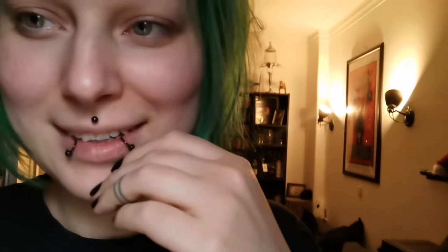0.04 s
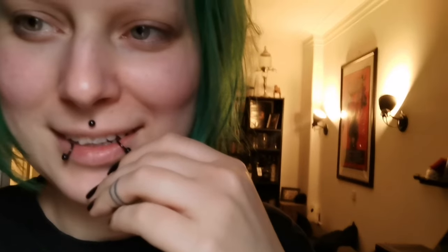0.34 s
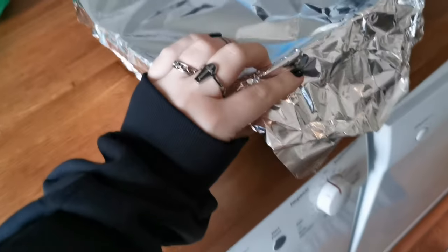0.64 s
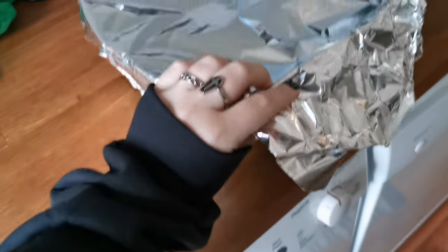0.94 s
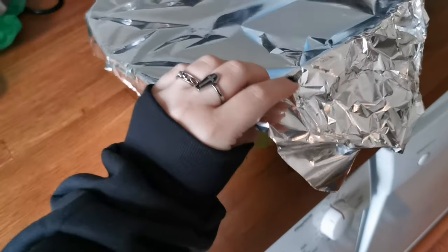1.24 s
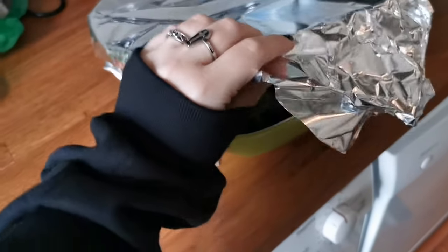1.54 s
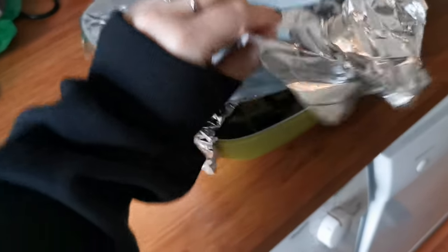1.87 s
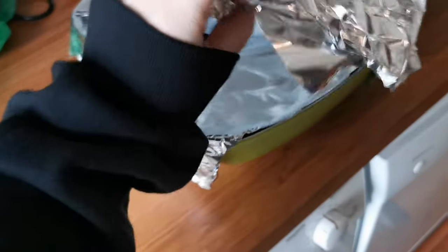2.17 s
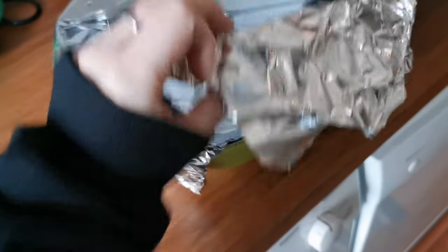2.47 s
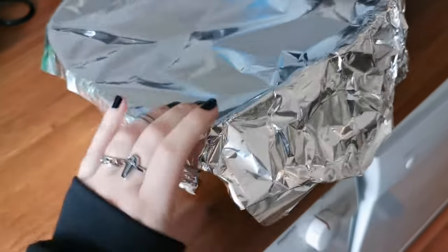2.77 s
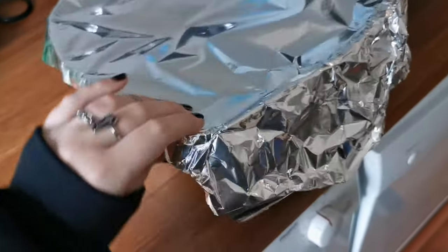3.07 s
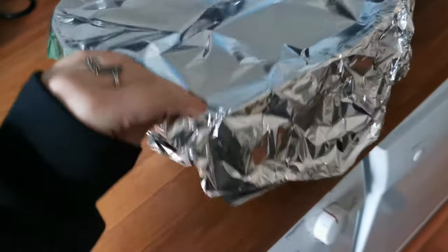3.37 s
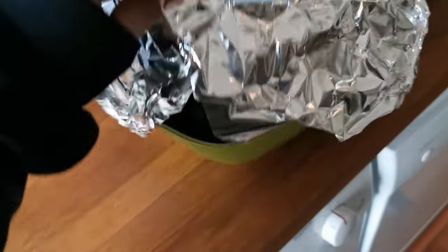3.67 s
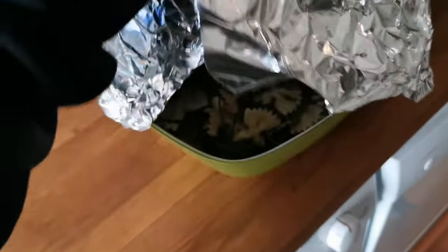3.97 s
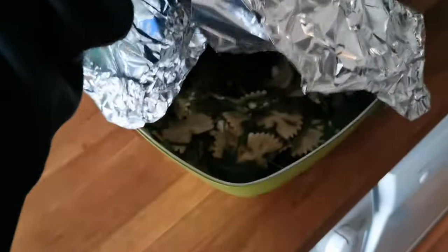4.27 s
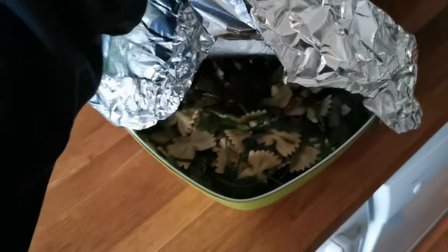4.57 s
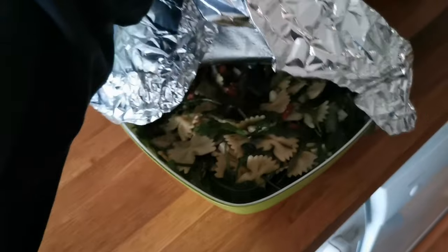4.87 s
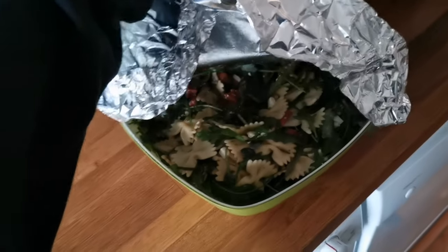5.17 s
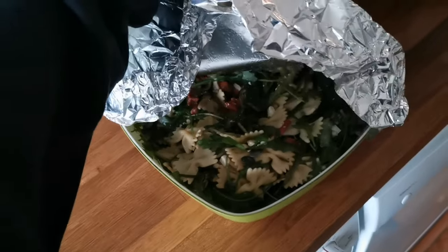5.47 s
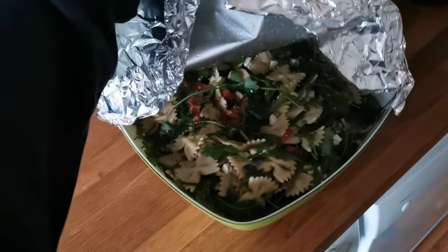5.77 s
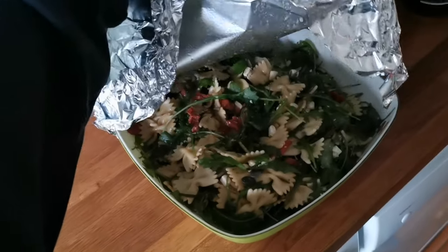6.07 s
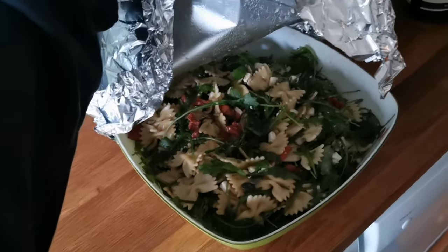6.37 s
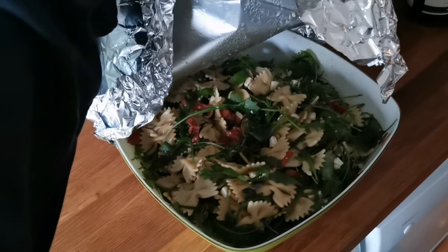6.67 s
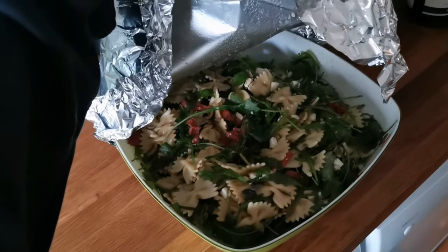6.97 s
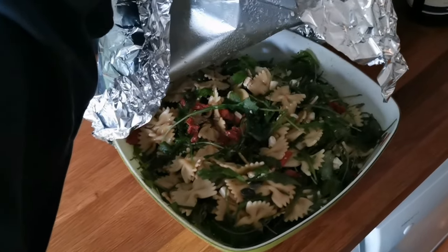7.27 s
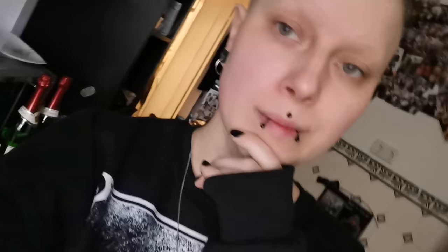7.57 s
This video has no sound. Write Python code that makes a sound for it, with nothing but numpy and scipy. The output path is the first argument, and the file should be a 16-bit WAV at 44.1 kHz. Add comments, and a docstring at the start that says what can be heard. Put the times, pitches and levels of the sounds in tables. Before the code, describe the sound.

Aluminium foil crinkles, crackles and snaps as it is peeled back from a dish in a small kitchen, with faint handling rumble.

```python
"""Aluminium foil peeled back from a dish of pasta on a kitchen counter, heard from a hand-held phone.
Its facets buckle in little avalanches of clicks, big creases snap, the loose sheet flaps and bumps
the dish. The kitchen rings briefly; the hand on the phone rumbles, mostly in the right microphone.
A moment of another room's quiet air and a short silence come first."""
import sys
import numpy as np
from scipy import signal
from scipy.fft import rfft, irfft
from scipy.io import wavfile
from scipy.ndimage import uniform_filter1d

SR = 44100
rng = np.random.default_rng(int(sys.argv[2]) if len(sys.argv) > 2 else 0)


def materialize(psi):
    """Save the field psi as 16-bit PCM at rate SR to the path in sys.argv[1].

    A 1-D psi becomes a single channel; in a 2-D psi each row is a channel.
    """
    bounded = np.clip(np.atleast_2d(psi).T, -1, 1)
    quanta = np.round(bounded * 32767).astype(np.int16)
    wavfile.write(sys.argv[1], SR, quanta)


N = 340888
TIME, FREQS = np.arange(N) / SR, np.fft.rfftfreq(N, 1 / SR)
FIRST_ROOM_END_S, KITCHEN_START_S, KITCHEN_END_S = 0.413, 0.665, 7.587
USUAL_EFFORT_DB = -50  # an ordinary pull on the foil


def amp(db):
    return 10 ** (np.asarray(db) / 20)


def unit_rms(x):
    return x / np.sqrt(np.mean(x ** 2) + 1e-20)


def at_hz(table, hz, column=1):
    """One column of a spectrum table, interpolated on a log-frequency axis."""
    table = np.array(table, float)
    return np.interp(np.log(hz + 1), np.log(table[:, 0] + 1), table[:, column])


def over_time(table):
    return np.interp(TIME, *np.transpose(table))


def add(mix, start_s, sound):
    part = mix[:, max(round(start_s * SR), 0):][:, :sound.shape[1]]
    part += sound[:, :part.shape[1]]


def colour(x, gain_db, size=2048):
    """Causal filter with the response gain_db(hz)."""
    log_gain = np.log(amp(gain_db(abs(np.fft.fftfreq(size, 1 / SR)))))
    taps = np.fft.ifft(np.exp(np.conj(signal.hilbert(log_gain)))).real
    return signal.oaconvolve(x, taps[None, :size // 2], axes=1)[:, :N]


def unit_band(x, lo_hz, hi_hz):
    return unit_rms(signal.sosfilt(signal.butter(3, [lo_hz, hi_hz], "band", fs=SR, output="sos"), x))


def noise(spectrum):
    """Two unrelated channels of steady noise with a given spectrum."""
    return unit_rms(irfft(rfft(rng.standard_normal((2, N))) * amp(at_hz(spectrum, FREQS)), N))


def thud(hz, decay_cycles):
    """A soft blow sets off a damped swing."""
    turns = np.arange(SR // 5) / SR * hz
    swing = np.sin(2 * np.pi * turns) * np.exp(-turns / decay_cycles) * (1 - np.exp(-turns / 0.11))
    return swing / abs(swing).max()


# Room tone of the first room. Each row: frequency in Hz, relative density in dB.
FIRST_ROOM_AIR = [(40, -26), (110, -33), (300, -6.5), (450, -5), (800, -11.5), (1200, -12), (2000, -11),
                  (4000, -20), (8000, -27.5), (11000, -20.5), (15500, -32)]
# Room tone of the kitchen. Each row: frequency in Hz, relative density in dB, left over right in dB.
KITCHEN_AIR = [(39.4, 8.5, -6.5), (110, -3.5, -4), (191, -10.5, 1.5), (410, -2, -6.5), (750, -14.5, -13),
               (1020, -11.5, -15.5), (1330, -15.5, -21.5), (1780, -17, -4), (2100, -18.5, -18.5),
               (3120, -24, -9.5), (7600, -35.5, 9), (11300, -31.5, -9.5), (15500, -39, 7)]


def room_tone(first_room_db=-73, kitchen_db=-62):
    """Steady air noise around the microphones, softer in the first room."""
    air = noise(KITCHEN_AIR)
    left = colour(air[:1], lambda hz: at_hz(KITCHEN_AIR, hz, column=2) / 2)
    right = colour(air[1:], lambda hz: -at_hz(KITCHEN_AIR, hz, column=2) / 2)
    first_room = amp(first_room_db) * noise(FIRST_ROOM_AIR)
    return np.where(TIME < KITCHEN_START_S, first_room, amp(kitchen_db) * np.vstack([left, right]))


# Rumble in the phone's case. Each row: frequency in Hz, relative density in dB.
CASE_RUMBLE = [(10, -8.5), (22, -3), (36, -8.5), (55, -9), (80, -19), (130, -25.5), (300, -37),
               (900, -99.5)]
# The hand on the phone, shakier once it leans over the dish.
# Each row: time in seconds, relative level in dB.
HAND_SHAKE = [(0.03, -65), (0.09, -51.5), (0.41, -60), (0.67, -56.5), (0.96, -61), (1.2, -74), (3.6, -78),
              (3.85, -55), (4.55, -57), (4.77, -50.5), (5.55, -53), (5.7, -48), (6.7, -52.5), (7.58, -46.5)]
# Fingers shift on the case. Each row: start in seconds, peak on the right in dB, pitch in Hz.
FINGER_TAPS = [(6.21, -35.5, 254), (6.813, -36.5, 337), (6.981, -36.5, 224), (7.173, -40, 319),
               (7.504, -33.5, 160), (7.515, -27, 37.7), (7.538, -36, 110)]


def handling_noise():
    """The case carries rumble and taps; in the kitchen the grip lies by the right microphone."""
    left_db = np.where(TIME < KITCHEN_START_S, -4, -19)
    out = noise(CASE_RUMBLE) * amp(over_time(HAND_SHAKE) + 4.5) * amp([left_db, np.zeros(N)])
    for start_s, db, hz in FINGER_TAPS:
        add(out, start_s, amp([[db - 35], [db]]) * thud(hz, decay_cycles=0.34))
    return out


# The kitchen's ring, heard at the counter. Each row: frequency in Hz, seconds to fall by 60 dB.
KITCHEN_T60 = [(200, 0.36), (1000, 0.21), (3500, 0.36), (9000, 0.23), (15000, 0.19)]


def kitchen_reverb(x, wet_db, build_s=0.0023, tails=4):
    """Direct sound plus diffuse tails; the echo pattern shifts as the sound moves over the sheet."""
    out = x.copy()
    for k in range(tails):
        hz, t, spectra = signal.stft(rng.standard_normal((2, SR // 2)), SR, nperseg=256)
        spectra *= amp(-60 * t / at_hz(KITCHEN_T60, hz)[:, None]) * (1 - np.exp(-t / build_s))
        tail = signal.istft(spectra, SR, nperseg=256)[1]
        tail /= np.linalg.norm(tail[0])
        share = np.sqrt(2 / tails) * np.cos(np.pi * (TIME * 7 + k / tails))
        out += amp(wet_db) * signal.fftconvolve(x * share, tail, axes=1)[:, :N]
    return out


# The phone's microphone pair. Each row: frequency in Hz, left over right in dB, likeness from 0 to 1.
MIC_PAIR = [(200, 4.5, 1), (500, -4.5, 0.99), (1020, 3, 0), (1530, 0, 0.6), (2190, -3.5, 0.06),
            (3950, 2.5, 0), (5600, 3, 0.1), (6400, 10, 0.2), (7600, 24, 0), (9000, 31.5, 0.99),
            (9870, -2, 0), (10380, -0.5, 0.98), (12200, 1.5, 0.6), (14000, 9, 0.3)]
# Arrival at the right microphone. Each row: frequency in Hz, lag behind the left in milliseconds.
RIGHT_LAG = [(100, 0), (4000, 0.31), (5200, 0.0)]


def microphones(x):
    """The two microphones hear alike in some bands; in others the right one is shadowed."""
    left, right = rfft(x)
    alike = np.clip(at_hz(MIC_PAIR, FREQS, column=2), 0, 1)
    lean = amp(at_hz(MIC_PAIR, FREQS))
    mid = np.sqrt(1 + alike) * (left + right) / 2
    side = np.sqrt(1 - alike) * (left - right) / 2
    lag = np.exp(-2j * np.pi * FREQS * at_hz(RIGHT_LAG, FREQS) / 1000)
    return irfft(np.array([lean * (mid + side), lag * (mid - side)]) * np.sqrt(2 / (1 + lean ** 2)), N)


# Soft blows at the dish. Each row: start in seconds, relative level in dB, pitch in Hz, decay in cycles.
SHEET_BUMPS = [(0.668, -47.5, 770, 1.1), (1.208, -51.5, 580, 1.2), (1.935, -55.5, 635, 22),
               (1.95, -57, 518, 15), (2.273, -56, 180, 0.9), (2.692, -35.5, 860, 0.49),
               (2.705, -49, 440, 0.94), (4.605, -49, 242, 1.3), (5.044, -49, 217, 0.88),
               (5.644, -58, 532, 9.6), (6.022, -61, 500, 1.9), (6.254, -49, 312, 2.2)]


def sheet_bumps():
    """The loose sheet flaps or bumps against the dish."""
    out = np.zeros((2, N))
    for start_s, db, hz, decay_cycles in SHEET_BUMPS:
        add(out, start_s, amp([[db], [db]]) * thud(hz, decay_cycles))
    return out


# The foil's broad spectrum. Each row: frequency in Hz, gain in dB.
FOIL_SPECTRUM = [(100, -27.5), (220, -14), (370, -5.5), (530, -7.5), (760, -4), (1650, -9), (2050, -7),
                 (3300, -4), (5000, -5), (7800, -1.5), (9700, -4.5), (10900, -2.5), (13800, -6.5),
                 (15700, -7.5)]
# Resonances of the air under the foil, then of the bent sheet.
# Each row: centre in Hz, width in Hz, gain in dB.
FOIL_RESONANCES = [(240, 18, 3), (303, 16, 5), (385, 58, 9), (528, 30, 15.5), (635, 28, 9.5),
                   (830, 26, 10.5), (1076, 260, 5), (2260, 370, 3), (3380, 600, -2), (4800, 1500, 3.5)]


def foil_gain_db(hz):
    """The sheet and the hollow beneath it colour every click."""
    peaks_db = sum(db / (1 + (2 * (hz - centre) / width) ** 2) for centre, width, db in FOIL_RESONANCES)
    return at_hz(FOIL_SPECTRUM, hz) + peaks_db


def facet_pop(ring_s, uneven_db, ping_hz, ping_db, ping_s, size=1400):
    """One facet pops: a crack that dies in a few ms, and a thin metallic ping."""
    t, hz = np.arange(size) / SR, np.fft.rfftfreq(size, 1 / SR)
    modes_db = uneven_db * np.interp(hz, np.linspace(0, SR / 2, num=18), rng.standard_normal(18))
    phases = np.exp(2j * np.pi * rng.random((2, len(hz))))
    crack = irfft(phases * amp(modes_db)) * np.exp(-t / ring_s)
    ping = np.sin(2 * np.pi * (ping_hz * t + rng.random((2, 1)))) * np.exp(-t / ping_s)
    return unit_rms(unit_rms(crack) + amp(ping_db) * unit_rms(ping)) / np.sqrt(size)


# Big creases giving way over the dish.
# Each row: start in seconds, relative level in dB, relative treble in dB, ping in Hz.
CREASE_SNAPS = [(0.668, -38, -6.5, 2370), (0.6739, -37, -4, 9100), (0.8034, -36.5, -13, 7400),
                (0.9277, -39.5, 5, 5430), (0.968, -41.5, -4, 2840), (1.0335, -45, 1.5, 9100),
                (1.103, -35, -33, 8250), (1.206, -35.5, 0.5, 6900), (1.4137, -32.5, -26, 5700),
                (1.801, -39.5, -5.5, 4900), (1.933, -28, -2.5, 9000), (2.094, -41, 7.5, 8400),
                (2.2227, -40.5, -6.5, 3950), (2.2726, -31, -16, 4320), (2.4514, -39, 8.5, 7040),
                (2.9543, -47.5, 13.5, 9000), (3.108, -31.5, -12, 8000), (3.4798, -35, 0, 8460),
                (3.858, -31, -25, 8650), (3.9559, -29, -16.5, 8260), (4.0485, -31.5, -10.5, 5650),
                (4.1036, -34, -8, 7700), (4.1971, -30.5, -8, 2900), (4.517, -32, -1, 8600),
                (4.6068, -29, -5.5, 8850), (4.9074, -38, -17.5, 7900), (5.3994, -35, -5.5, 2720),
                (5.548, -41.5, -6, 6100), (5.6322, -34.5, -3.5, 5600), (5.8182, -32.5, -16, 6500),
                (5.938, -34.5, -21, 8060), (6.0234, -29, -22, 2520), (6.257, -35, -31, 3580),
                (6.405, -48, 4, 3900), (6.5948, -33, -19, 3860), (6.961, -43.5, -1.5, 7860),
                (6.979, -49.5, -21.5, 4370), (7.1084, -48, -29, 2940), (7.149, -36.5, -16, 8050),
                (7.2259, -42.5, -9, 4830), (7.5132, -57, -18, 6900)]


def crease_snaps(ring_s=0.0011, uneven_db=4.5, ping_db=-13, ping_s=0.0011, run_s=0.012, neighbours=10):
    """A big crease snaps through and sets off its neighbours, each weaker and with its own ping."""
    out = np.zeros((2, N))
    for start_s, db, treble_db, ping_hz in CREASE_SNAPS:
        snap = np.zeros((2, 4096))
        add(snap, 0, facet_pop(ring_s, uneven_db, ping_hz, ping_db + 6, ping_s))
        for late in (np.arange(neighbours) + rng.random(neighbours)) / neighbours:
            crack = facet_pop(ring_s, uneven_db, ping_hz * 2 ** rng.uniform(-.5, 0.75), ping_db, ping_s)
            add(snap, run_s * late, amp(-6 - 8 * late) * crack)
        treble = signal.lfilter([.5, -.5], [1], snap)  # tight creases sound brighter than broad ones
        add(out, start_s, amp(db) * (snap + (amp(treble_db + 6.5) - 1) * treble))
    return amp(16) * colour(out, lambda hz: foil_gain_db(hz) - 6 * (hz < 1500))


# The steady pull that keeps the foil rustling between tugs. Each row: time in seconds, effort in dB.
STEADY_PULL = [(0.76, -74), (0.82, -63), (1.09, -62.5), (1.25, -54), (1.66, -58), (1.76, -67.5),
               (1.82, -54.5), (3.2, -54), (3.85, -47.5), (4.5, -47.5), (4.6, -53), (4.88, -59),
               (5.28, -58.5), (5.35, -59), (5.52, -58.5), (5.75, -51.5), (6.42, -60.5), (6.5, -79.5)]
# Tugs on the foil. Each row: peak time in seconds, effort in dB, rise and fall in seconds,
# extra fine wrinkles in dB, extra flexing of the sheet in dB.
FOIL_TUGS = [(0.831, -49.5, 0.035, 0.076, 2, 4.5), (1.153, -44.5, 0.021, 0.026, 6.5, -6),
             (1.215, -47.5, 0.013, 0.024, 6, -2), (1.498, -42, 0.13, 0.14, -1, 0.5),
             (1.978, -39, 0.086, 0.059, 2.5, -3.5), (2.12, -47.5, 0.09, 0.24, 2.5, -6),
             (2.32, -39, 0.035, 0.08, -1, -3.5), (2.479, -43.5, 0.04, 0.093, 0.5, -9),
             (2.77, -49, 0.15, 0.22, 4, -9), (3.0, -49, 0.03, 0.074, 3.5, 2),
             (3.31, -51.5, 0.18, 0.33, 9, -13.5), (3.6, -41, 0.18, 0.09, 0, -2),
             (3.709, -40, 0.06, 0.041, 4, 2), (4.64, -49, 0.046, 0.14, 3, 2),
             (5.21, -46.5, 0.25, 0.082, 3.5, 0.5), (5.659, -46.5, 0.056, 0.073, 3.5, 3.5),
             (5.84, -41, 0.063, 0.05, -5, -0.5), (6.06, -45.5, 0.024, 0.058, -2, 5),
             (6.298, -54, 0.082, 0.1, 3, 11.5)]


def pull_levels(tug_drop_db=11, flex_lead_s=0.015):
    """Pull plus tugs give the effort; fine wrinkles and the sheet's flexing follow it. All in dB."""
    power, character = amp(over_time(STEADY_PULL)) ** 2, np.zeros((2, N))
    for peak_s, db, rise_s, fall_s, fine_db, flex_db in FOIL_TUGS:
        away = np.maximum((peak_s - TIME) / abs(rise_s), (TIME - peak_s) / abs(fall_s))
        tug = amp(db - tug_drop_db * np.minimum(away, 20)) ** 2
        power += tug
        character += np.outer([fine_db, flex_db], tug)
    effort = 10 * np.log10(power)
    tug_fine, tug_flex = character / power
    opened = np.interp(TIME, [3.0, 6.2], [0, 1])  # the dish goes from covered to open
    extra = effort - USUAL_EFFORT_DB
    fine = effort - 3 + 0.32 * extra - opened + tug_fine
    flex = effort - 23.5 + 0.3 * extra + 10.5 * opened + tug_flex
    early_flex = np.interp(TIME + flex_lead_s, TIME, flex)  # the sheet bends before its facets give way
    return effort, fine, early_flex


def avalanches(slips_per_s=55, fade_s=.008):
    """Each slip of the foil starts a surge at once, which then dies away."""
    slips = (rng.random(N) < slips_per_s / SR) * amp(np.minimum(rng.exponential(1, N), 3))
    return 0.75 + signal.lfilter([1], [1, -np.exp(-1 / (fade_s * SR))], slips)


def ring_facets(kicks, refold_s=0.25, scatter_db=1.5, facets=20):
    """Each kick rings one facet with its own ping and side; each refold brings new facets into play."""
    struck = rng.integers(0, facets, N)
    out, step = np.zeros((2, N)), round(refold_s * SR)
    for start in range(0, N, step):
        now = slice(start, start + step)
        pings_hz = np.geomspace(2200, 14500, facets) * 2 ** (rng.uniform(-0.73, 1, facets) / 10)
        for k, ping_hz in enumerate(pings_hz):
            side = amp(scatter_db * rng.standard_normal() * np.array([[.5], [-.5]]))
            ring_s = 0.001 * 2 ** rng.uniform(-0.86, 1)
            pop = facet_pop(ring_s, uneven_db=4, ping_hz=ping_hz, ping_db=-12, ping_s=0.0023)
            own_kicks = kicks[now] * (struck[now] == k)
            add(out, start / SR, signal.fftconvolve(own_kicks[None], side * pop, axes=1))
    return out


# Where the foil gives way, heard from the phone. Each row: time in seconds, left over right in dB.
PEEL_POSITION = [(0.8, -3.5), (2.1, -5.5), (3.0, -1.5), (3.75, -5), (4.5, 0.5), (5.45, -7), (5.8, -2.5),
                 (6.5, 0.5)]


def foil_crinkle(base_per_s=1500, spread_db=4):
    """Facets buckle in avalanches, more of them the harder the pull; most are tiny, a few are large."""
    effort_db, fine_db, flex_db = pull_levels()
    apart = np.interp(effort_db, [-48, -42], [1, .3])  # a hard pull merges the slips into one surge
    surge = avalanches() ** apart
    pops_per_s = base_per_s * surge * amp(.7 * (effort_db - USUAL_EFFORT_DB)) + 150
    buckles = rng.random(N) < pops_per_s / SR
    size_db = spread_db * np.sqrt(apart) * np.minimum(rng.exponential(1, N), 4.5)
    clicks = ring_facets(buckles * surge * amp(size_db))
    local_rms = np.sqrt(abs(uniform_filter1d((clicks ** 2).mean(0), size=4400)) + 1e-9)
    clicks = colour(clicks / local_rms, foil_gain_db)  # levelled: the hand's work sets the loudness
    loose_db = np.interp(TIME, [1.3, 2.2, 5.8], [-25, -7, -3])  # the freed sheet sways lower
    sheet = unit_band(clicks, 87, 667) + amp(loose_db) * unit_band(clicks, 60, 263)
    panels_db = np.interp(TIME, [3.0, 4.3, 5.7], [-25, -12, -7])  # flat panels buckle as it folds back
    creases = unit_band(clicks, 1390, 6840) + amp(panels_db) * unit_band(clicks[::-1], 1240, 2160)
    wrinkles = unit_band(clicks, 8080, 18200)
    crinkle = amp(effort_db - 6) * creases + amp(fine_db) * wrinkles + amp(flex_db) * sheet
    pan_db = over_time(PEEL_POSITION)
    pulling = (TIME > STEADY_PULL[0][0]) & (TIME < STEADY_PULL[-1][0])
    return crinkle * amp(np.array([pan_db, -pan_db]) / 2) * pulling


def scene():
    """Foil and kitchen reach the phone's two microphones, over handling noise and room tone."""
    foil = kitchen_reverb(foil_crinkle(), wet_db=3.5)
    foil += kitchen_reverb(crease_snaps(), wet_db=3)
    foil += kitchen_reverb(sheet_bumps(), wet_db=4)
    return microphones(foil) + handling_noise() + room_tone()


def record(dry):
    """The phone is silent between the two rooms and at the end, and passes nothing above 16 kHz or so."""
    running = (TIME < FIRST_ROOM_END_S) | ((TIME > KITCHEN_START_S) & (TIME < KITCHEN_END_S))
    gated = dry * uniform_filter1d(running.astype(float), size=64)
    lowpass = signal.firwin(401, 15900, window=("kaiser", 9), fs=SR)
    return signal.oaconvolve(gated, lowpass[None], "same")


dry = scene()
out = record(dry)
materialize(out)
```